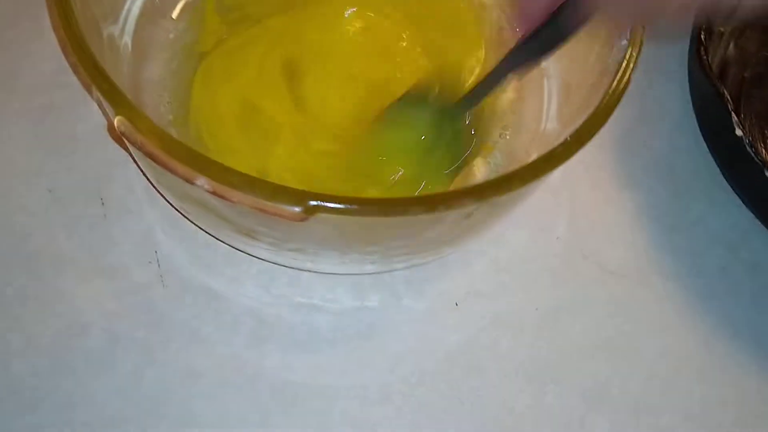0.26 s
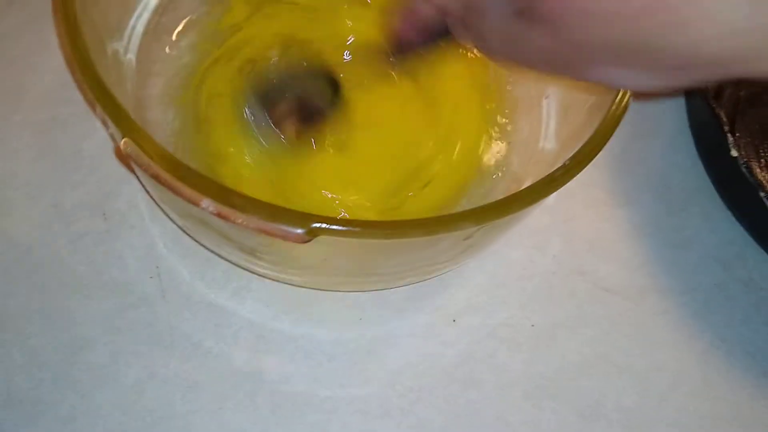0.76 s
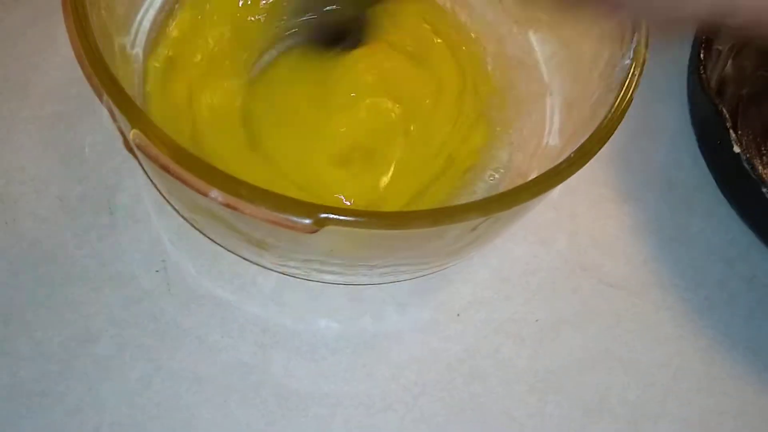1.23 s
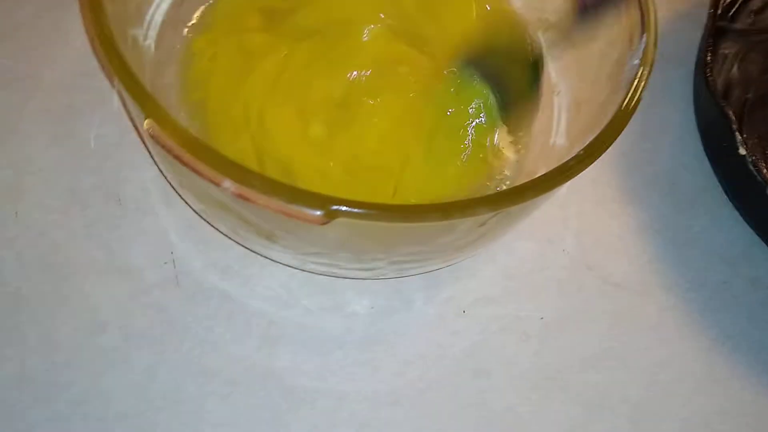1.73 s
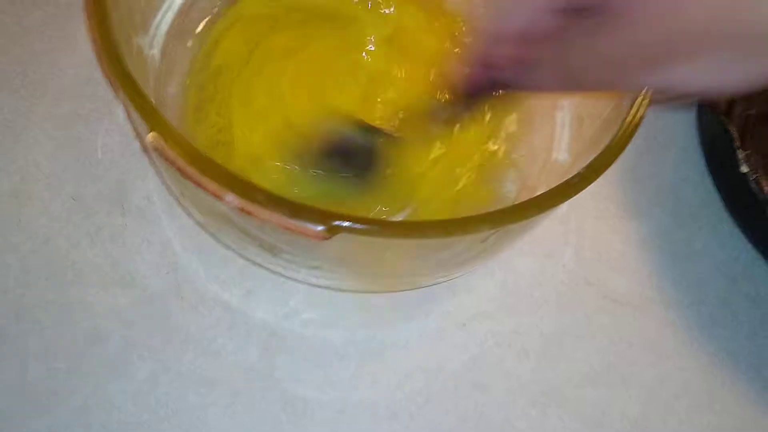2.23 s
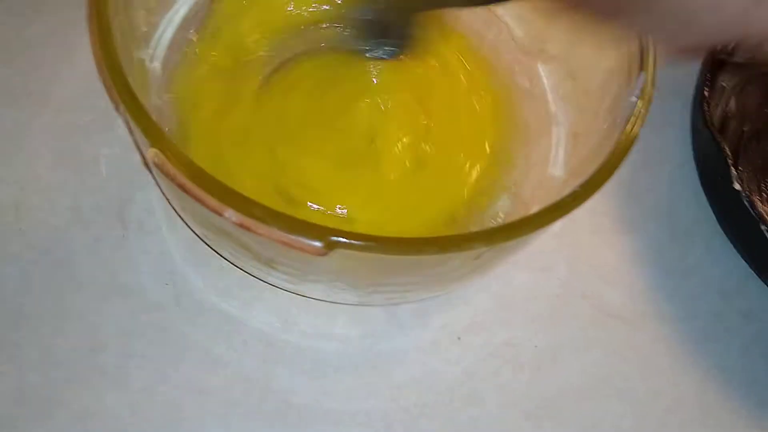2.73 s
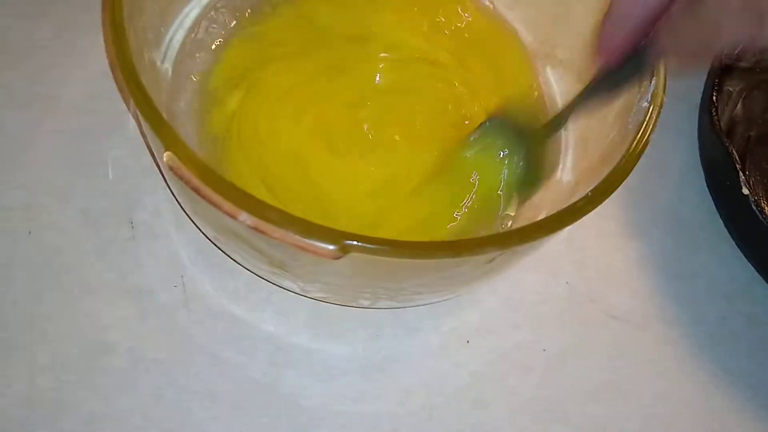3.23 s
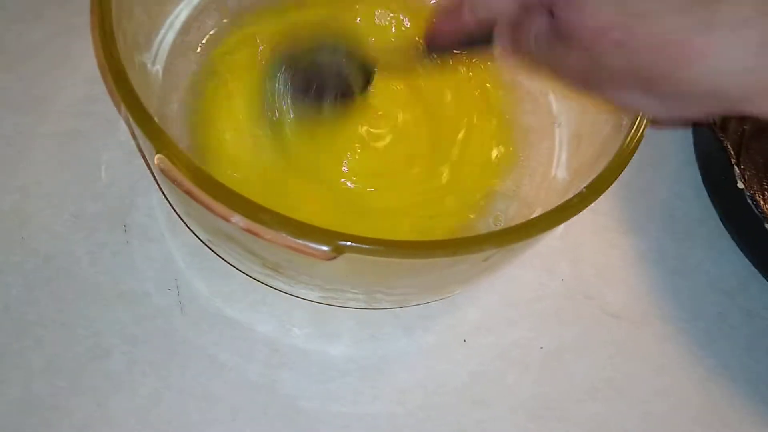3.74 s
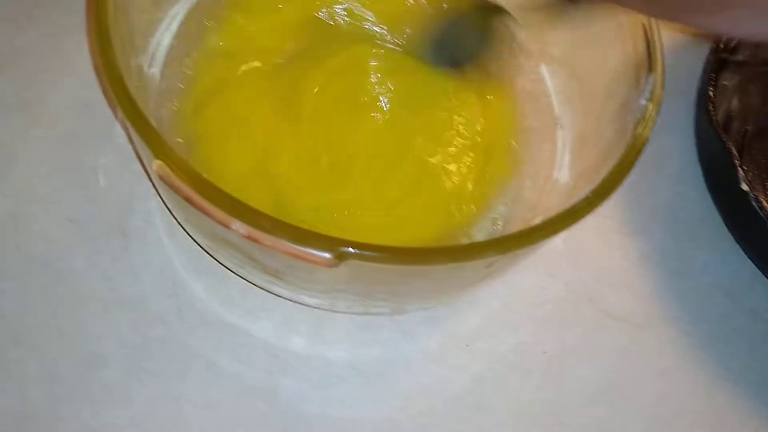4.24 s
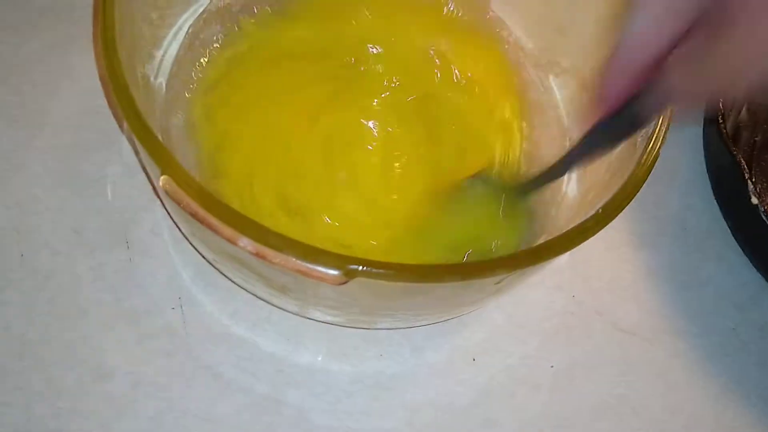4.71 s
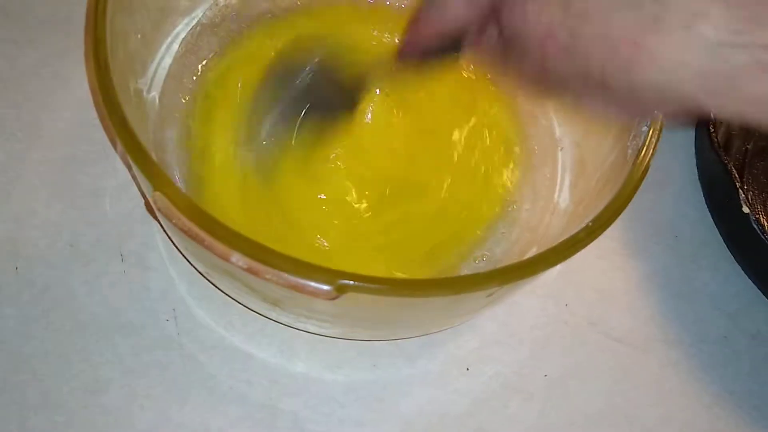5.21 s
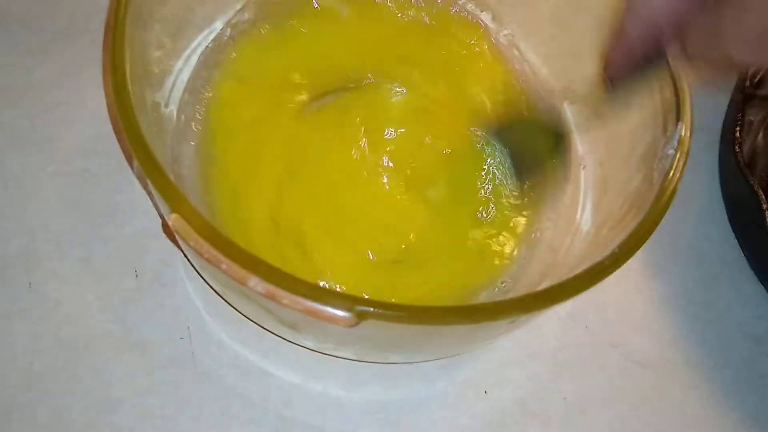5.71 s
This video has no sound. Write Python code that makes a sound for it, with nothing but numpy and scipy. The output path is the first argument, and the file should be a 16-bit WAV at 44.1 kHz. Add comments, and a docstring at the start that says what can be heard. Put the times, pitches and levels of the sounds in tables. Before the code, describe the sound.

Fast, steady spoon stirring in an egg-filled glass bowl: muted scraping rings, small taps, liquid plops, one double clink late on, quiet kitchen.

```python
"""A metal spoon scrapes round through beaten egg in a glass bowl on a kitchen counter.
Random slips and tick-like catches ring the egg-damped glass modes; filtered noise is the steel grit.
Air pockets pop and glide as sines, low thuds go through the counter, and one double blow on the
bare wall rings its free modes. Sparse kitchen reflections, room noise and mains hum lie behind."""
import sys
import numpy as np
from scipy import signal
from scipy.fft import rfft, irfft, next_fast_len
from scipy.io import wavfile

SR = 44100
rng = np.random.default_rng(int(sys.argv[2]) if len(sys.argv) > 2 else 0)


def voltage_ratio(level):
    """Linear amplitude factor for a level in decibels (scalar or array-like)."""
    return 10 ** (np.asarray(level, float) / 20)


def unload_audio(sound):
    """Save the sound as a 16-bit wav file, at the path given as the first command line argument."""
    columns = np.transpose(np.atleast_2d(sound))
    # keep every value between -1 and 1, then stretch to whole-number steps
    steps = np.round(np.clip(columns, -1, 1) * 32767)
    wavfile.write(sys.argv[1], SR, steps.astype(np.int16))


N = 262836


def evened(x):
    """Scales to rms 1."""
    return x / np.sqrt(np.mean(x ** 2) + 1e-20)


def read(points, hz):
    """Reads a spectrum on a log-frequency axis."""
    f, value = np.transpose(points)
    return np.interp(np.log(hz + 1), np.log(f + 1), value)


def colour(x, gain):
    """Filters by gain(hz), which may be complex."""
    size = next_fast_len(N + 4096)
    spectrum = rfft(x, size) * gain(np.fft.rfftfreq(size, 1 / SR))
    return irfft(spectrum, size)[..., :N]


def resonate(x, hz, width_hz):
    """A resonance of gain 1 that may follow a moving frequency: shift to 0 Hz, smooth, shift back."""
    turn = np.exp(2j * np.pi * np.cumsum(hz * np.ones(len(x))) / SR)
    r = np.exp(-np.pi * abs(width_hz) / SR)
    return 2 * (turn * signal.lfilter([1 - r], [1, -r], x / turn)).real


def wander(per_s):
    """Random curve of rms 1 with per_s straight segments a second."""
    count = int(N / SR * per_s) + 2
    return evened(np.interp(np.arange(N) * per_s / SR, np.arange(count), rng.standard_normal(count)))


def add(mix, start_s, sound):
    """Mixes a sound in at start_s."""
    part = mix[round(start_s * SR):][:len(sound)]
    part += sound[:len(part)]


def grit(per_s, spread_db):
    """Tiny slips of random sign, a few of them large."""
    size = voltage_ratio(spread_db * np.minimum(rng.exponential(1, N), 4)) * rng.choice([-1., 1.], N)
    return evened(size * (rng.random(N) < per_s / SR))


# Turns of the spoon, from its pass through the deep egg.
# Each row: start in seconds, pressure in dB, dryness of the glass in dB.
SPOON_TURNS = [(-.15, 6, -5), (.22, 1, 6), (.6, 2.5, 0.5), (.98, -0.5, 5.5), (1.372, 1.5, 8), (1.758, 2, 3),
               (2.122, 1.2, 2.5), (2.51, 1.5, 1.5), (2.882, 4, 5.5), (3.266, -1.5, 6.5), (3.619, 3.5, -2),
               (3.975, 0.9, 4.5), (4.332, 2, 8), (4.7, 1.5, 1), (5.061, 4, 3.5), (5.42, 4, 4),
               (5.776, 3.5, 2), (6.14, 18.5, 8)]
# Modes the edge reaches on its way round.
# Each row: share of the turn, then relative levels in dB of middle, hiss, low and upper modes.
REACH_ROUND_TURN = [(.05, -53, -55.5, -56, -50.5), (.2, -48, -56, -55, -53),
                    (.35, -58, -52.5, -59.5, -50.5), (.55, -46.5, -57.5, -64.5, -59.5),
                    (.7, -52.5, -53, -59.5, -55), (.9, -49.5, -56.5, -55.5, -52.5)]
# The edge presses flat on the wall and the modes flare.
# Each row: middle time in seconds, middle-mode level in dB, upper-mode level in dB, length in seconds.
MODE_FLARES = [(0.0, -26, -42, 0.021), (0.196, -45, -70, 0.015), (0.373, -35, -45, 0.027),
               (0.445, -36, -63, 0.017), (0.795, -53, -58.5, 0.13), (0.973, -43.5, -61, 0.063),
               (1.178, -44.5, -54, 0.094), (1.424, -47.5, -57, 0.059), (1.53, -53, -45.5, .05),
               (1.545, -37, -53, 0.038), (1.606, -36, -55, 0.037), (1.662, -58, -45, 0.021),
               (1.93, -38.5, -49, 0.059), (2.33, -29.5, -51, 0.045), (2.702, -37.5, -57.5, 0.051),
               (2.851, -34, -55, 0.011), (3.012, -45, -46, 0.063), (3.1, -35, -52, 0.038),
               (3.262, -38, -57, 0.035), (3.502, -51, -56, 0.14), (3.801, -43.5, -59, 0.086),
               (4.128, -33.5, -46.5, 0.062), (4.423, -41, -53, 0.023), (4.513, -37.5, -51.5, 0.066),
               (4.717, -31, -54, 0.02), (4.888, -45, -55, 0.058), (5.097, -55, -49, 0.051),
               (5.223, -55, -46, 0.043), (5.293, -50, -62, 0.044), (5.577, -43, -50.5, 0.15),
               (5.95, -34, -56, 0.083)]
# Spoon pressure changes, nearly all lifts off the glass.
# Each row: middle time in seconds, length in seconds, level change in dB.
SPOON_LIFTS = [(0.138, 0.11, -6), (0.682, 0.097, -7.5), (0.9, 0.047, 2.5), (1.44, 0.075, -9.5),
               (2.443, 0.09, -6), (2.61, 0.034, -9), (2.82, 0.27, -7), (3.19, 0.067, -10),
               (3.86, 0.056, -7), (4.275, 0.18, -11), (5.28, 0.039, -12.5), (5.445, 0.03, -19),
               (5.854, 0.24, -8.5)]
# Dry swishes of the edge above the egg.
# Each row: start in seconds, length in seconds, relative hiss level in dB.
DRY_SWISHES = [(0.065, 0.056, -62), (0.45, 0.21, -50.5), (0.933, 0.082, -47), (1.297, 0.061, -83),
               (2.005, 0.15, -52), (2.451, 0.061, -55), (3.254, 0.059, -49), (3.479, .14, -47.5),
               (3.89, 0.093, -60), (4.563, 0.176, -48), (4.826, 0.04, -41), (5.31, 0.044, -60),
               (5.432, 0.22, -52.5), (5.71, 0.073, -56)]


def drag():
    """Four drag levels in dB: the pattern of a turn, moved by pressure, lifts, flares, swishes and skips."""
    swish_edge_s = 0.0037
    skips_per_s, skip_max_db, skip_fade_s = 35, 8, 0.0051
    t = np.arange(0, N + 64, 64) / SR

    def bell(middle_s, length_s):
        return np.exp(-4 * ((t - middle_s) / length_s) ** 2)

    start_s, pressure_db, dryness_db = np.transpose(SPOON_TURNS)
    share, *columns = np.transpose(REACH_ROUND_TURN)
    turn = np.interp(t, start_s, np.arange(len(start_s)))
    push_db = np.interp(t, start_s, pressure_db)
    push_db = push_db + sum(db * bell(s, length_s) for s, length_s, db in SPOON_LIFTS)
    middle, dry, low, upper = (voltage_ratio(np.interp(turn, share, c, period=1) + push_db) for c in columns)

    middle = middle + sum(voltage_ratio(db) * bell(s, length_s) for s, db, _, length_s in MODE_FLARES)
    upper = upper + sum(voltage_ratio(db) * bell(s, length_s) for s, _, db, length_s in MODE_FLARES)
    dry = dry * voltage_ratio(np.interp(t, start_s, dryness_db))
    for s, length_s, db in DRY_SWISHES:
        inside_s = np.minimum(t - s, s + length_s - t)
        dry = dry + voltage_ratio(db) * np.clip(inside_s / swish_edge_s + .5, 0, 1)

    # the edge jumps and lands again
    landings = (rng.random(N) < skips_per_s / SR) * rng.uniform(0.33, 1, N)
    landed = signal.lfilter([1], [1, -np.exp(-1 / (skip_fade_s * SR))], landings)
    skips_db = 2.5 * wander(45) + skip_max_db * np.tanh(landed)
    time_s = np.arange(N) / SR
    return [np.interp(time_s, t, 20 * np.log10(level)) + skips_db for level in (middle, dry, low, upper)]


# Modes of the egg-damped glass under the spoon.
# Each row: frequency in Hz, nominal width in Hz, relative level in dB.
DAMPED_MODES = [(1123.6, 50, -1), (1718, 95, 2.5), (1922.6, 46.5, 7), (2650, 62, 0.5), (2740, 49, -2),
                (3120, 91, -7), (3400, 60, -10), (3549, 82, 1.5), (3679, 128, 0.5), (4223, 150, 4),
                (5340, 51, -12.5), (6117, 100, -13.5), (7140, 100, -10)]
SWING_DB = 3.5  # rms left-right lean of each mode


def scrape(middle_db, hiss_db, low_db, upper_db):
    """Slips ring the damped modes; the moving contact point shifts their pitch, share and side."""
    out = np.zeros((2, N))
    catches = grit(260, 5.36)  # larger catches reach all modes at once
    for hz, width_hz, db in DAMPED_MODES:
        group_db = low_db if hz < 2300 else middle_db if hz < 3000 else upper_db if hz < 5000 else hiss_db
        slips = 0.81 * grit(1500, 4.85) + 0.51 * catches
        slips = slips * voltage_ratio(group_db + db + 2.56 * wander(30))
        place_hz = hz * (1 + 0.012 * wander(8))
        ring = resonate(resonate(slips, place_hz, width_hz), place_hz, 5.1 * width_hz)
        ring = ring * np.sqrt(SR / width_hz) / 3
        out += ring * voltage_ratio(SWING_DB / 2 * wander(9) * np.array([[1], [-1]]))
    return out


# Spectrum of steel grit on glass. Each row: frequency in Hz, relative density in dB per Hz.
GRIT_SPECTRUM = [(2650, -49), (4500, -13.5), (5440, -6), (6580, -15.5), (7340, -12), (8830, -19),
                 (9950, -2.5), (12300, -7), (14500, 2.5), (15800, -2), (16500, -60)]
# Phase lead of the left port. Each row: frequency in Hz, nominal lead in radians.
LEFT_LEAD = [(200, 0), (1460, .2), (1900, 1.9), (2300, 3.1), (3650, 6.9), (4400, 9.6), (5860, 5.6),
             (7580, .3), (8700, -3.2), (11200, -11.5), (14700, -2.5)]


def hiss(level, crack):
    """Steel grit in six bands that flutter apart, and cracks across all; part reaches both ports with a lag."""
    edges_hz = [0, 6600, 8800, 10600, 12300, 14000, SR]
    grains = np.zeros((3, N))
    for low, high in zip(edges_hz[:-1], edges_hz[1:]):
        band = np.array([grit(6000, 8.8) for _ in range(3)]) * voltage_ratio(4.24 * wander(35))
        grains += colour(band, lambda hz: voltage_ratio(read(GRIT_SPECTRUM, hz)) * (hz >= low) * (hz < high))
    burst = np.array([grit(12000, 7.2) for _ in range(3)])
    burst = colour(burst, lambda hz: voltage_ratio(read(GRIT_SPECTRUM, hz)))
    both, left, right = evened(grains) * level + evened(burst) * crack

    def lagged(side):
        return colour(both, lambda hz: np.exp(.5j * side * read(LEFT_LEAD, hz)))

    ports = np.array([.75 * left + 0.64 * lagged(0.98), 0.8 * right + 0.49 * lagged(-1.046)])
    return ports * voltage_ratio([[1], [-1]])  # dB per port


# Kitchen reverberation. Each row: frequency in Hz, t60 in seconds.
KITCHEN_DECAY = [(200, 0.32), (1000, 0.22), (4000, 0.12), (12000, 0.074)]


def kitchen(x):
    """Sparse reflections of random sign, each band dying at its own speed."""
    taps = np.zeros((2, SR // 2))
    slots = np.arange(200, SR // 2 - 20, 20)
    at = slots + rng.integers(0, 20, (2, (SR // 2 - 201) // 20))
    np.put_along_axis(taps, at, rng.choice([-1., 1.], at.shape), 1)
    hz, t, z = signal.stft(taps, SR, nperseg=256)
    fade = voltage_ratio(-60 * t / read(KITCHEN_DECAY, hz)[:, None])
    tail = signal.istft(z * fade, SR, nperseg=256)[1]
    return signal.fftconvolve(x[None], tail / np.linalg.norm(tail[0]), axes=1)[:, :N]


# Room noise spectrum. Each row: frequency in Hz, relative density in dB per Hz.
AIR_SPECTRUM = [(30, -34), (60, -16), (86, -15), (119, 1), (160, -14), (205, -1), (270, 2), (340, -4),
                (700, -6), (1500, -30.5), (4000, -65), (15000, -77)]
# Mains hum. Each row: frequency in Hz, level in dB rms before wavering.
MAINS_HUM = [(59.5, -67.5), (119, -90)]


def room_tone():
    """Soft noise, partly opposed at the ports in the bass and partly shared above, and a wavering mains hum."""
    air_db_rms = -58.5
    a, b = rng.standard_normal((2, N))
    right = -.3 * a + b + colour(a, lambda hz: 0.87 * (hz > 180))
    noise = np.array([a, right]) * voltage_ratio([[1], [-1]])  # dB per port
    noise = colour(noise, lambda hz: voltage_ratio(read(AIR_SPECTRUM, hz)))
    t = np.arange(N) / SR
    hum = np.zeros((2, N))
    for hz, db in MAINS_HUM:
        tone = np.sin(2 * np.pi * hz * t + np.array([[0], [1.7]]))
        hum += voltage_ratio(db + 0.98 * wander(4.9)) * np.sqrt(2) * tone
    return voltage_ratio(air_db_rms) * evened(noise) + hum


# The spoon's edge catching the glass. Each row: time in seconds, relative level in dB,
# relative treble crack above it in dB, relative bass-mode level above it in dB.
EDGE_TICKS = [(0.19, -32, -7.5, -23), (0.26, -30.5, -18, -2.5), (0.29, -30, -30, -25),
              (0.438, -22.5, -17.5, -26), (0.4845, -20.5, -11.5, -8.5), (0.539, -17, -12.5, -15.5),
              (0.567, -24, -20, -25), (0.9434, -36.5, 2, -6), (0.9784, -36, -2, -9),
              (0.996, -37.5, -12, -1.5), (1.127, -24, -31, -37), (1.297, -28.5, -8, -18),
              (1.3327, -38, 7, -20), (1.4067, -32.5, -28, 12), (1.6275, -26, -11, -6.5),
              (1.68, -32, -12, -11), (1.72, -48, 9, -15), (1.736, -29, -4.5, -3), (2.005, -29.5, -2.5, -18),
              (2.018, -31.5, -4, -6), (2.098, -34, 0, -23), (2.1914, -16.5, -15.5, -17),
              (2.3096, -23, -38, -15.5), (2.5002, -21, -14, -12), (2.6356, -28.5, -26, -23),
              (2.8487, -21, -17, -20), (2.898, -28, -12, -36), (2.9355, -43, -25, -23),
              (2.952, -22.5, -28, -22), (3.0883, -36, -34, -13), (3.2544, -25, -10, -13),
              (3.5684, -32.5, -2, -5), (3.7484, -23, -30, -18), (3.7939, -22.5, -20, -18),
              (3.8899, -14.5, -14.5, -19), (3.9894, -25, -29, -26), (4.0897, -19, -18, -21),
              (4.4055, -19, -18, -13.5), (4.478, -24.5, -30, -16), (4.5918, -20.5, -21, -9),
              (4.65, -30, -4, -14), (4.783, -17, -5.5, -8.5), (4.827, -14.5, -11, -9),
              (4.9403, -18.5, -18, -2.5), (5.055, -29, -13, -20), (5.0776, -27, -27, -35),
              (5.097, -37, -20, -25), (5.112, -26, -48, -24), (5.181, -25.5, -8, -11.5),
              (5.208, -30.5, -8, -15), (5.3036, -21, -28, -15), (5.3137, -21.5, -5, -17),
              (5.395, -34, 1, -17), (5.423, -33, 0, -14), (5.525, -18.5, -11, -36), (5.58, -27, -5, -23),
              (5.661, -38.5, 5, -29), (5.7342, -27, -7, -13), (5.9355, -22.5, -20, -29)]


def ticks():
    """Each catch is a stutter of blows on the damped modes; also returns its bright crack's envelope."""
    t, out, crack = np.arange(3500) / SR, np.zeros((2, N)), np.zeros(N)
    luck = rng.standard_normal((len(EDGE_TICKS), len(DAMPED_MODES), 3))  # pitch, share, side
    stutter = rng.uniform(-0.972, 1, (len(EDGE_TICKS), 400)) ** 15  # few large blows
    stutter = stutter * np.exp(-t[:400] / 0.0047) * 0.38
    stutter[:, 0] = 1
    cushion = 1 - np.exp(-t / 0.00035)  # the egg film cushions the contact
    crack_shape = np.exp(-t / 0.0038) - np.exp(-t / 0.001)
    hz, width_hz, mode_db = np.transpose(DAMPED_MODES)[:, :, None]
    for (s, db, treble_db, bass_db), row, blows in zip(EDGE_TICKS, luck, stutter):
        rings = np.sin(2 * np.pi * hz * (1 + 0.029 * row[:, :1]) * t)
        rings = rings * np.exp(-np.pi * .8 * width_hz * t)
        share_db = mode_db + 2.5 * row[:, 1:2] + (bass_db + 5.0) * (hz < 2300) - 0.82 * (hz > 5000)
        blows = blows / np.linalg.norm(blows)
        for port, side in zip(out, (1, -1)):
            share = voltage_ratio(share_db + side * SWING_DB / 2 * row[:, 2:])
            soft = (share * rings).sum(0) * cushion
            add(port, s - .001, voltage_ratio(db - 12.0) * np.convolve(soft, blows))
        add(crack, s - .0015, voltage_ratio(db + treble_db + 7.0) * crack_shape)
    return out, crack


# Air pockets popping open behind the spoon.
# Each row: time in seconds, settled frequency in Hz, relative level in dB, t60 in seconds.
AIR_POPS = [(0.597, 1160, -28.5, 0.03), (1.372, 728, -11, 0.03), (1.758, 740, -22.5, 0.031),
            (2.122, 605, -38.5, 0.12), (2.284, 487, -41.5, 0.04), (2.510, 1242, -19, 0.04),
            (2.882, 657, -29.5, 0.096), (3.005, 1840, -29, 0.055), (3.266, 770, -26, 0.083),
            (3.619, 581, -18.5, 0.061), (3.975, 660, -30, 0.08), (4.332, 531, -31, 0.045),
            (4.938, 1754, -24, 0.066), (5.772, 590, -36, 0.12)]
# Pockets that shrink climb in pitch, those that swell fall. Each row: start in seconds,
# length in seconds, first Hz, last Hz, relative peak level in dB, relative last level in dB.
POCKET_GLIDES = [(1.38, 0.019, 750, 920, -32, -24), (1.393, 0.021, 1010, 3400, -23.5, -26),
                 (1.763, 0.079, 760, 1185, -30, -63), (2.091, 0.015, 1800, 1280, -36.5, -59),
                 (2.51, 0.0096, 3680, 1780, -21.5, -44), (3.294, 0.023, 780, 1010, -43, -49),
                 (3.311, 0.017, 1055, 3400, -58, -31), (3.621, 0.11, 578, 1575, -22.5, -57.5),
                 (4.348, 0.081, 570, 1254, -36.5, -53), (4.683, 0.021, 1565, 547, -42.5, -57),
                 (4.711, 0.031, 550, 665, -46.5, -47.5), (5.41, 0.034, 1463, 1005, -62, -51),
                 (5.458, 0.067, 627, 1360, -50, -68), (5.758, 0.017, 1860, 1110, -33.5, -65),
                 (5.783, 0.022, 572, 2050, -54, -38.5)]
# Air in the bowl rings on. Each row: frequency in Hz, width in Hz, level in dB.
BOWL_AIR = [(630.4, 56, 2.5), (1154, 92, 10.5)]


def pockets():
    """Pops ring down from a sudden start, changing pockets sing a glide; the bowl's air rings after them."""
    pop_sharp, pop_settle_s = 0.13, 0.002  # pitch starts this share high
    bend = 1.9  # glides move fastest at the high end
    peak_at, start_db, fall_power = 0.203, -16.5, 0.69  # share of length, dB below peak, quick first fall
    out, phase, t = np.zeros(N), np.zeros(N), np.arange(8000) / SR
    snap = np.sin(2 * np.pi * 1250 * t) * np.exp(-t / 0.0018)  # the film tears as the pocket opens
    for s, hz, db, t60_s in AIR_POPS:
        turns = np.cumsum(hz * (1 + pop_sharp * np.exp(-t / pop_settle_s))) / SR
        pop = voltage_ratio(db - 60 * t / t60_s) * np.clip(t / 0.0012, 0, 1) * np.sin(2 * np.pi * turns)
        add(out, s, pop + voltage_ratio(db - 9.5) * snap)
        add(phase, s, turns)
    for s, length_s, first_hz, last_hz, peak_db, last_db in POCKET_GLIDES:
        u = np.arange(0, length_s, 1 / SR) / length_s
        way = u ** bend if last_hz > first_hz else 1 - (1 - u) ** bend
        # carries on its pop's swing
        turns = phase[round(s * SR)] + np.cumsum(first_hz * (last_hz / first_hz) ** way) / SR
        fall = (np.maximum(u - peak_at, 0) / (1 - peak_at)) ** fall_power
        level_db = peak_db + start_db * np.maximum(1 - u / peak_at, 0) + (last_db - peak_db) * fall
        edges = np.clip(np.minimum(u, 1 - u) * length_s / 0.0025, 0, 1)
        add(out, s, voltage_ratio(level_db) * edges * np.sin(2 * np.pi * turns))
    return 0.74 * out + sum(voltage_ratio(db) * resonate(out, hz, width_hz) for hz, width_hz, db in BOWL_AIR)


# The bowl rocks on the counter. Each row: time in seconds, relative level in dB.
BOWL_BUMPS = [(1.402, -52), (1.788, -55), (3.031, -57), (3.639, -49), (4.79, -56), (4.834, -41),
              (5.577, -51)]


def bumps():
    """Soft low thuds through the counter top: two sines under a short swell and decay."""
    t, out = np.arange(8000) / SR, np.zeros(N)
    thud = np.sin(2 * np.pi * 112 * t) + .5 * np.sin(2 * np.pi * 205 * t)
    thud = thud * (np.exp(-t / 0.011) - np.exp(-t / 0.007))
    for s, db in BOWL_BUMPS:
        add(out, s, voltage_ratio(db + 12) * thud)
    return out


# Blows on the bare wall. Each row: time in seconds, relative level in dB.
WALL_BLOWS = [(4.783, -23), (4.826, -27.5)]
# Modes of the free wall. Each row: frequency in Hz, relative level in dB, t60 in seconds.
FREE_MODES = [(490, -12, .75), (1149, -13, 1.05), (1172, -6.5, 1.05), (1265, -9, .08), (2032, -12, .55),
              (2690, 0.5, 0.04), (2907, -22, .2), (3135, -18, .2), (3190, -13, 0.23), (3950, -16, 0.093),
              (4350, -8, 0.038), (5770, -11, 0.062), (7500, -5.5, 0.027), (384, -3, 0.013), (700, -10, .02)]


def clinks():
    """Blows on the bare wall set its free modes ringing, neighbours in opposite sense."""
    kept_db = -8.5  # a new blow first damps what still rings
    t, out = np.arange(SR) / SR, np.zeros(N)
    ring = np.zeros(SR)
    for k, (hz, db, t60_s) in enumerate(FREE_MODES):
        ring += (-1) ** k * voltage_ratio(db - 60 * t / t60_s) * np.sin(2 * np.pi * hz * t)
    ring *= 1 - np.exp(-t / 0.000087)
    for s, db in WALL_BLOWS:
        out[round(s * SR):] *= voltage_ratio(kept_db)
        add(out, s, voltage_ratio(db) * ring)
    return out


# Level tilt of the scraped glass. Each row: frequency in Hz, left minus right in dB.
PORT_TILT = [(300, 24), (1100, -2.5), (2400, 3), (4500, 4), (8000, 3.5), (14000, 1.5)]
# Reflected share. Each row: frequency in Hz, level in dB.
ECHO_SHARE = [(300, -0.5), (1000, -17.5), (3000, -12), (10000, -28)]


def scene():
    """The scraped glass reaches two ports with a tilt and a lag, pockets and clinks head-on; the kitchen answers."""
    levels_db = drag()
    rings, crack = ticks()
    glass = scrape(*levels_db) + rings
    open_top = pockets() + clinks()

    def half(hz):
        return voltage_ratio(read(PORT_TILT, hz) / 2) * np.exp(.5j * read(LEFT_LEAD, hz))

    near = np.array([colour(glass[0], half), colour(glass[1], lambda hz: 1 / half(hz))])
    near = near + open_top * voltage_ratio([[.9], [-.9]])  # dB per port
    echo = kitchen(colour(glass.mean(0) + 0.62 * open_top, lambda hz: voltage_ratio(read(ECHO_SHARE, hz))))
    grains = hiss(voltage_ratio(levels_db[1] + 0.5), crack)
    return near + echo + grains + bumps() * voltage_ratio([[2], [-2]]) + room_tone()


def top_cut(x):
    """Nothing passes above the cut-off."""
    return signal.sosfilt(signal.butter(12, 16820, fs=SR, output="sos"), x)


def record(dry):
    """The microphone drops deep bass and the top treble."""
    heard = colour(dry, lambda hz: 1 / np.sqrt((1 + (45 / (hz + 1)) ** 8) * (1 + (hz / 15600) ** 80)))
    return top_cut(heard)


dry = scene()
out = record(dry)
unload_audio(out)
```